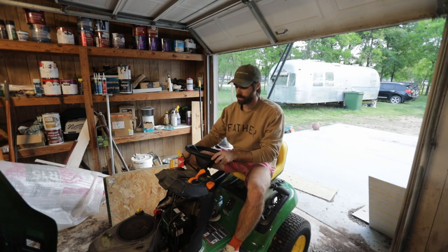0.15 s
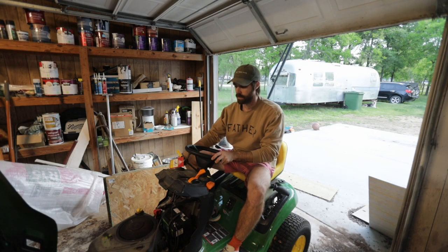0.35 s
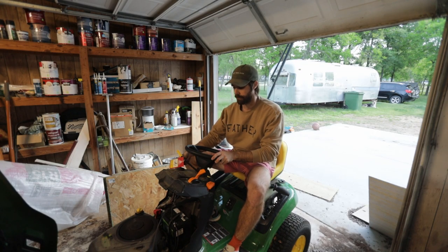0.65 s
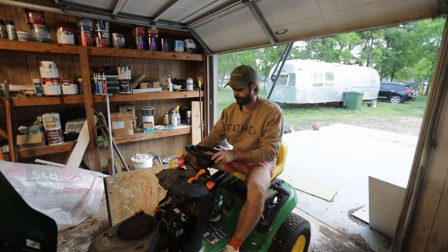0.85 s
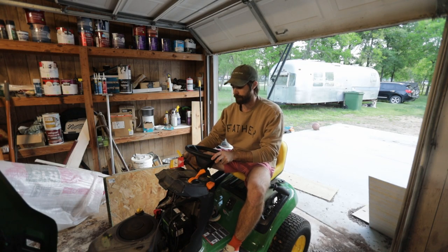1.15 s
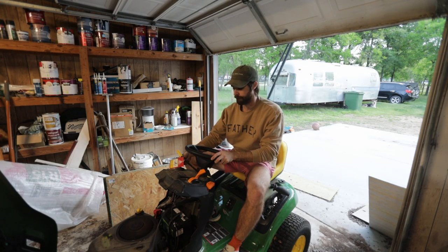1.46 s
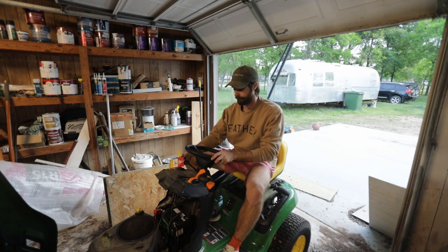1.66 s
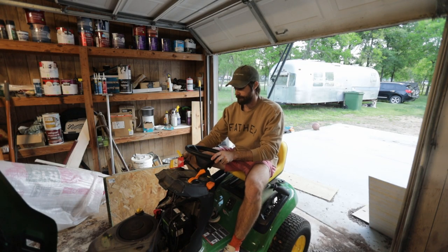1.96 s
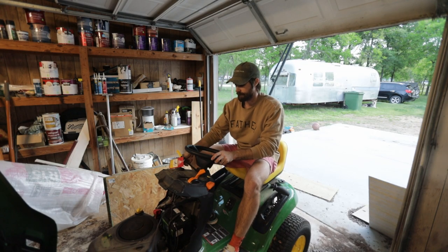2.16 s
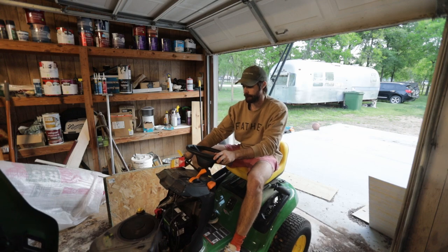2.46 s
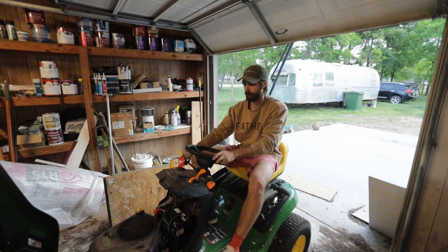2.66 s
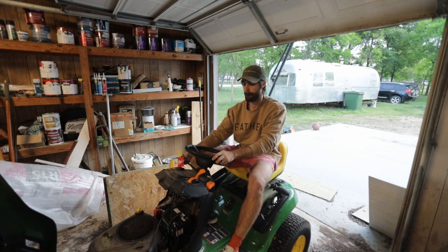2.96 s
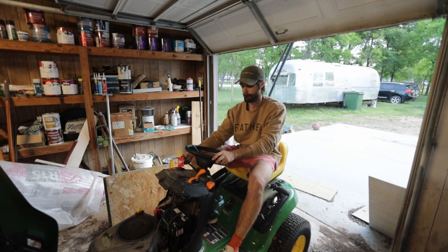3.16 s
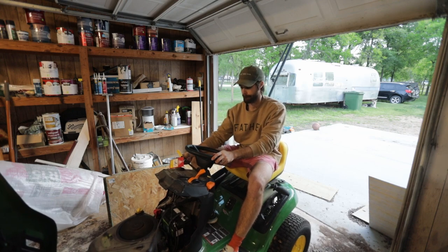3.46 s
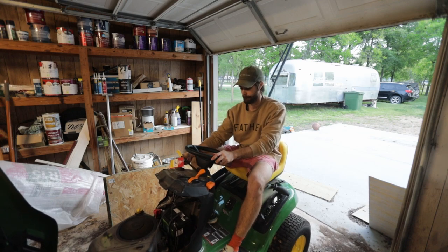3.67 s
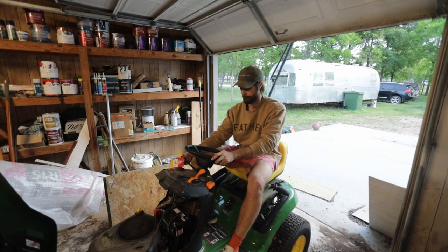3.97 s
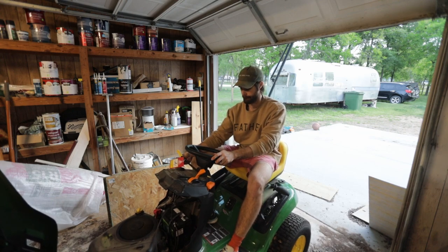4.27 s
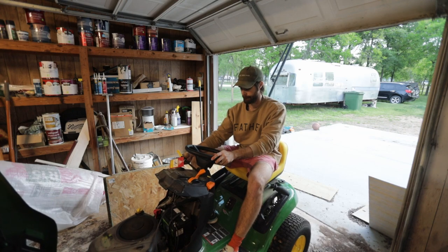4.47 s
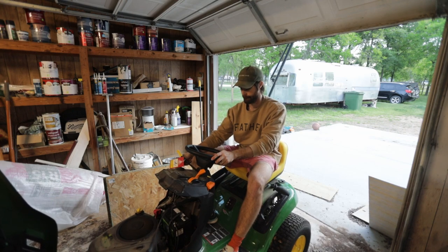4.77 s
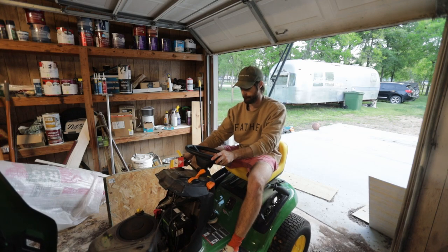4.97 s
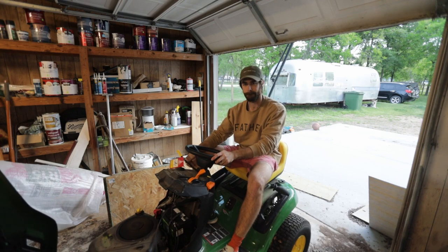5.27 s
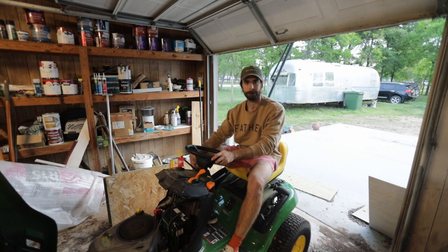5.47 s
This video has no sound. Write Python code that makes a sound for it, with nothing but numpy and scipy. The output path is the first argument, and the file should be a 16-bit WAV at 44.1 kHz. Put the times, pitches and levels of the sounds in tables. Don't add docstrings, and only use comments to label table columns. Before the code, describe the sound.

Close and loud, slightly distorted: a small petrol engine winds down with faint knocks, then the starter slams in and grinds for about a second and a half, chugging about six times a second. It stops, coasts and clunks. Another slam, more grinding and chugging, then the engine catches with a clatter and booms quickly to the end, with short garage reverberation.

```python
import sys
import numpy as np
from scipy import signal
from scipy.fft import rfft, irfft, next_fast_len
from scipy.io import wavfile

SR = 44100
rng = np.random.default_rng(int(sys.argv[2]) if len(sys.argv) > 2 else 0)


def log_audio(samples):
    frames = np.atleast_2d(samples).T
    limited = np.clip(frames, -1, 1)
    pcm = np.round(limited * 32767).astype(np.int16)
    wavfile.write(sys.argv[1], SR, pcm)


def decibels_to_gain(level_db):
    exponent = np.asarray(level_db, float) / 20
    return 10 ** exponent


N = 247742

# [frequency_hz, density_db_per_hz]
CRANK_COLOUR = [(24, -47), (40, -19), (64, -0.5), (166, -11.5), (280, -15.5), (418, -2), (688, -7.5),
                (1420, -5.5), (1870, -11.5), (3310, -4.5), (4360, -7), (5880, -15.5), (9210, -24),
                (10700, -27), (15600, -38.5)]
RUN_COLOUR = [(40, -15), (85, 13), (183, -2), (334, -23), (418, -19), (688, -21.5), (1000, -20.5),
              (1610, -22), (2170, -25), (3850, -26), (6000, -35), (9000, -43.5), (12000, -50),
              (15600, -48.5)]
# [frequency_hz, width_hz, level_over_colour_db]
CRANK_PEAKS = [(412, 150, 2.5), (765, 21, 3.5), (1000, 50, 1.5), (1331, 50, -0.5), (1429, 60, 2.5),
               (1751, 40, 3), (2128, 50, 3.5), (2386, 45, 4), (2675, 49, 0), (3175, 36, 0.5),
               (3794, 120, 2), (4390, 110, 2.5), (5070, 100, 2), (9500, 1300, 3.5)]
RUN_PEAKS = [(424, 70, 3.6), (872, 30, 10), (1000, 26, 4.9), (1600, 150, 1.4), (3760, 210, 2.8),
             (4520, 73, 2)]
# [frequency_hz, level_db, t60_s]
HOUSING = [(348, -5, .09), (385, -3, .1), (427.5, -3.5, 0.084), (500, -5, 0.029), (629, -7, 0.14),
           (727, -5, 0.017), (769, 4, 0.02), (1008, -5.5, 0.048), (1287, -2, .06), (1424, -10, 0.074),
           (1688, 0.5, 0.023), (2286, -2.5, 0.035), (2720, -22, .025)]
# [frequency_hz, t60_s, lag_ms]
SILENCER = [
    (71, .18, .2),
    (113, .07, 2.9),
    (188, .045, 3.4),
]
# [start_s, length_s, pitch_hz, level_db]
CHIRPS = [(.5, .04, 9080, -66), (0.557, 0.057, 3330, -53), (.568, 0.026, 9850, -57),
          (0.602, 0.037, 9740, -60), (.615, .05, 5600, -66), (0.353, .3, 231, -53), (0.437, 0.15, 415, -49),
          (0.495, 0.084, 1707, -57), (1.135, 0.041, 1417, -20), (2.62, 0.42, 543, -55),
          (0.716, 0.037, 362, -5), (.48, 0.17, 7400, -74), (3.19, 0.05, 1420, -19), (3.28, .04, 1450, -21),
          (4.647, 0.013, 1420, -17.5), (4.679, 0.025, 1468, -6.5), (4.847, 0.47, 1000, -23.5),
          (4.92, 0.47, 872, -28), (.79, .14, 1435, -22.5), (.93, .06, 1830, -25), (3.24, .1, 1850, -25),
          (.85, .13, 4900, -31), (3.31, .11, 4600, -28), (2.338, .03, 1030, -33)]
# [time_s, motion_below_cranking_db]
COASTS = [
    [(0.0, -11), (0.088, -16), (0.19, -17), (0.284, -23), (0.38, -29), (0.452, -27), (0.518, -32),
     (0.687, -39.5)],
    [(2.26, -12), (2.36, -15), (2.42, -18), (2.55, -22), (2.67, -34), (2.78, -42), (3.027, -43.5)],
]
# [solenoid_s, drive_stops_s, pinion_slam_db, slam_brightness_db, slam_knock_hz]
STARTS = [
    (0.69, 2.19, -1, 7, 1426),
    (3.029, 4.7, -4, -0.5, 743),
]
# [cranking_db, fall_near_rest_db, bend_of_fall, labouring_db, racing_db, step_at_firing_db]
GRIND = [
    (-33, -23.5, .8, -17, -5, 6),
    (-19.5, -35, 1.4, -2.5, -2.5, 2.5),
    (-21.5, -40.5, 1.02, -4, 1.5, -0.8),
    (-31, -47, .95, -8, 1.5, -1.5),
]
# [intake_opens_s, pop_db, first_turn_squeak_db, second_turn_squeak_db]
CYCLES = [
    [(0.784, -12, -18.5, -12), (1.022, -7.5, -40, -16), (1.201, -4.5, -21, -20.5), (1.373, -4, -17, -20.5),
     (1.539, -4.5, -20, -14), (1.706, -5, -27.5, -16), (1.87, -4.5, -11.5, -18.5), (2.033, -5, -40, -40),
     (2.207, -4.5, -40, -40)],
    [(3.03, -40, -40, -19), (3.261, -4.5, -17, -17.5), (3.454, -3.5, -10.5, -15), (3.623, -6, -24, -12.5),
     (3.791, -5.5, -16, -18), (3.952, -5, -40, -18), (4.119, -4, -18, -9), (4.283, -5, -29, -17.5),
     (4.445, -4.5, -15.5, -14), (4.608, -4.5, -15, -40), (4.734, -6, -40, -40)],
]
# [start_s, pop_db, valve_shuts_after_ms]
SLOW_INTAKE = [
    (.167, -18.5, 41.5),
    (2.459, -12.5, 30),
]
# [start_s, peak_db, brightness_db,
# knock_hz]
KNOCKS = [(.015, -28.5, -29, 1114), (.054, -22, -19.5, 1405), (0.115, -30.5, -19.5, 2600),
          (0.171, -23, -32, 1095), (0.21, -34, 7, 2420), (0.297, -30, -16, 1600), (0.393, -21, -26, 1160),
          (2.341, -27, -8.5, 1050), (2.37, -27, -3, 2000), (2.458, -19.5, -12, 2500),
          (2.482, -23, -2, 1540), (2.53, -26, -12.5, 3740)]
# [start_s, peak_db, brightness_db, knock_hz]
KICKS = [(4.646, -10, 1.5, 1470), (4.674, -10, -1, 4350), (4.685, -4.5, 9.5, 1460),
         (4.745, -11.5, 2.5, 4020), (5.105, -22, 4.5, 4080), (5.175, -22, 0.5, 910), (5.262, -21, 5, 3430)]
# [peak_db, brightness_db, housing_ring_db, rattle_s, knock_hz]
SOLENOID = (-9, -2, -4, .0077, 500)
FIRING_S = [4.664, 4.7754, 4.859, 4.9354, 5.0081, 5.0813, 5.1573, 5.2358, 5.3179, 5.4057, 5.4991, 5.589]
# [boom_db, crack_db, valve_tick_db]
FIRINGS = [(-10.5, -13.5, -13.5), (-10, -15, -11), (-15.5, -5.5, -13), (-6.5, -7, -22),
           (-11.5, -8.5, -17.5), (-8.5, -8, -22), (-9.5, -18, -26), (-11, -8, -16), (-8, -11, -20),
           (-12, -12.5, -24), (-10, -10.5, -15.5), (-11.5, -9.5, -15.5)]
CATCH_S = 4.72


def in_time(rows):
    s, *columns = np.transpose(rows)
    return [np.interp(np.arange(N) / SR, s, c) for c in columns]


def rms_one(x):
    return x / np.sqrt(np.mean(x ** 2) + 1e-20)


def clicks(times, db):
    out = np.full(N, 1e-18)
    at = np.clip(np.round(np.asarray(times) * SR).astype(int), 0, N - 1)
    np.add.at(out, at, decibels_to_gain(np.asarray(db)))
    return out


def ring(x, hz, t60):
    r, w = decibels_to_gain(-60 / (t60 * SR)), 2 * np.pi * hz / SR
    return signal.lfilter([0, np.sin(w)], [1, -2 * r * np.cos(w), r * r], x)


def soften(x, seconds):
    r = np.exp(-1 / (seconds * SR))
    return signal.lfilter([(1 - r) ** 2], [1, -2 * r, r * r], x)


def fade(x, seconds):
    return signal.lfilter([1], [1, -np.exp(-1 / (seconds * SR))], x)


def band(x, low_hz, high_hz):
    return signal.sosfilt(signal.butter(3, [low_hz, high_hz], "band", fs=SR, output="sos"), x)


def drift(rate_hz):
    return rms_one(soften(rng.standard_normal(N + SR), 1 / (2 * np.pi * rate_hz))[SR:])


def coloured(x, spectrum, peaks):
    hz = np.fft.rfftfreq(N, 1 / SR) + 1
    table_hz, table_db = np.transpose(spectrum)
    gain = decibels_to_gain(np.interp(np.log(hz), np.log(table_hz), table_db))
    humps = 1 + sum((decibels_to_gain(db) - 1) / (1 + (2 * (hz - at) / width) ** 2) for at, width, db in peaks)
    return irfft(rfft(x) * gain * humps, N)


def still_air():
    hiss = decibels_to_gain(-75.0) * band(rng.standard_normal(N), 9000, 15800)
    hush = decibels_to_gain(-64.5) * band(rng.standard_normal(N), 150, 1500)
    return hiss + hush + decibels_to_gain(-53.5) * band(rng.standard_normal(N), 130, 300)


def garage(x):
    t60_s, wall_cut_hz = .4, 1700
    size = next_fast_len(N + SR)
    w = 2 * np.pi * np.fft.rfftfreq(size, 1 / SR)
    t60 = t60_s / (1 + (w / (2 * np.pi * wall_cut_hz)) ** 2) ** 0.54
    tail = 0
    for k, lag in enumerate(np.geomspace(.013, .047, 10) * rng.uniform(0.9, 1.05, 10)):
        loop = 10 ** (-3 * lag / t60) * np.exp(-1j * w * lag)
        tail = tail + (-1) ** k * loop / (1 - loop)
    for lag in (.0013, .0031, .0047):
        delay = np.exp(-1j * w * lag)
        tail = tail * (delay - .6) / (1 - 0.41 * delay)
    return irfft(rfft(x, size) * tail, size)[:N]


def chirps():
    wander_share, wander_top_hz = .013, 30
    out = np.zeros(N)
    for s, length, hz, db in CHIRPS:
        size = round(length * SR)
        pitch = hz + min(wander_share * hz, wander_top_hz) * drift(23.5)[:size]
        swell = np.hanning(size) ** .5 * decibels_to_gain(3.4 * np.clip(drift(22)[:size], -3, 1.5))
        out[round(s * SR):][:size] += decibels_to_gain(db) * swell * np.sin(2 * np.pi * np.cumsum(pitch) / SR)
    return out


def cycles():
    last_cycle_s = .21
    s, *levels = np.vstack(CYCLES).T
    length = np.concatenate([np.diff(np.array(c)[:, 0], append=c[-1][0] + last_cycle_s) for c in CYCLES])
    since = s - np.repeat([on for on, *_ in STARTS], [len(c) for c in CYCLES])
    return s, length, since, levels


def tight_spots():
    s, length, _, (_, first_db, second_db) = cycles()
    times = np.concatenate([s + share * length for share in (.23, .725)])
    db = np.concatenate([first_db, second_db])
    heard = db > -35
    return times[heard], db[heard]


def squeaks():
    squeak_hz, spread_hz = 9150, 230
    out, t = np.zeros(N), np.arange(SR // 25) / SR
    for s, db in zip(*tight_spots()):
        hz = squeak_hz + spread_hz * rng.standard_normal()
        rub = rng.standard_normal(len(t)) * np.minimum(t / .004, 1) * np.exp(-t / .007)
        tone = ring(rub, hz, 0.015) + .6 * ring(rub, hz + 450, .008)
        out[round(s * SR):][:len(t)] += decibels_to_gain(db + 1.0) * tone / np.abs(tone).max()
    return out


def surge_db():
    tight = soften(fade(clicks(tight_spots()[0], 0), 0.015), .002)
    firing = np.array(FIRING_S)
    valve = np.cumsum(clicks(firing + 0.0033, 0) - clicks(firing + 0.044, 0))
    running = np.arange(N) / SR > CATCH_S
    return 3.7 * tight + 7.2 * (fade(valve, 0.0062) / (0.0073 * SR) - .5 * running)


def grind_db():
    mesh_s, labour_s, spin_up_s, race_s = .06, .13, .2, .16
    rest_db, run_eases_db = -40, -5
    driven = [(s, 0) for on, off, *_ in STARTS for s in (on + mesh_s, off)]
    motion_db, = in_time(sorted(driven + [tuple(row) for coast in COASTS for row in coast]))
    # [time_s, labouring share, racing share]
    stages = [(-.01, 0, 0), (0, 1, 0), (labour_s, 1, 0), (spin_up_s, 0, 1), (spin_up_s + race_s, 0, 0)]
    labour, race = in_time([(on + s, *shares) for on, *_ in STARTS for s, *shares in stages])
    fired, eased_db = in_time([(CATCH_S, 0, 0), (CATCH_S + .12, 1, 0), (N / SR, 1, run_eases_db)])
    slowed = np.maximum(motion_db / rest_db, 0)
    return [db + fall_db * slowed ** bend + labour_db * labour + race_db * race + step_db * fired + eased_db
            for db, fall_db, bend, labour_db, race_db, step_db in GRIND]


def turning_parts():
    heights = decibels_to_gain(2.3 * np.minimum(rng.exponential(1, N), 5.0))
    contacts = (rng.random(N) < 2500 / SR) * heights * rng.choice([-1, 1], N)
    drive = rng.standard_normal(N) + 0.65 * rms_one(contacts)
    fired = np.clip((np.arange(N) / SR - CATCH_S) / 0.05, 0, 1)
    streaks = 0
    for hz, width, db in CRANK_PEAKS:
        flare = decibels_to_gain(5 * np.clip(drift(16), -2, 1.7))
        streaks = streaks + rms_one(ring(drive * flare, hz, 3.0 / width)) * decibels_to_gain(db) * np.sqrt(width)
    crank = coloured(drive + decibels_to_gain(-45.0) * streaks, CRANK_COLOUR, CRANK_PEAKS)
    run = coloured(drive, RUN_COLOUR, RUN_PEAKS)
    shared, surge, out = drift(17), surge_db(), 0
    ranges_hz = [(40, 280), (280, 2000), (2000, 6500), (6500, 15800)]
    flickers_db = [1.2, .6, .7, .9]
    for (low, high), level_db, flicker_db in zip(ranges_hz, grind_db(), flickers_db):
        part = (1 - fired) * rms_one(band(crank, low, high)) + fired * rms_one(band(run, low, high))
        flicker = flicker_db * (shared + 1.6 * drift(25))
        out = out + part * decibels_to_gain(level_db + surge * (high / 15800) ** 0.42 + flicker)
    return out


def blow_list():
    rows = [(s, db, bright_db, -3, .016, hz) for s, db, bright_db, hz in KNOCKS]
    rows += [(s, db, bright_db, -1.5, .0095, hz) for s, db, bright_db, hz in KICKS]
    for on, _, db, bright_db, hz in STARTS:
        rows.append((on, *SOLENOID))
        rows.append((on + .017, db, bright_db, 3, .013, hz))
        rows.append((on + .084, -20, -10, 1.5, .011, 700))
    return rows


def blows():
    t, noise = np.arange(SR // 4) / SR, rng.standard_normal((3, N))
    crash, edge, knock, body = np.full((4, N), 1e-18)
    for s, db, bright_db, ring_db, length, hz in blow_list():
        at = slice(round(s * SR), min(round(s * SR) + len(t), N))
        shape = decibels_to_gain(db) * np.minimum(t / (.15 * length), 1) * np.exp(-(t / length) ** 0.86)
        shape = shape[:at.stop - at.start]
        struck = ring(shape * noise[0, at], hz, 25.0 / hz)
        knock[at] += decibels_to_gain(db) * struck / np.abs(struck).max()
        crash[at] += shape
        edge[at] += shape * decibels_to_gain(bright_db)
        body[at] += shape * decibels_to_gain(ring_db)
    rung = sum(decibels_to_gain(db - 26.5) * ring(soften(body, 2.7 / hz) * noise[2], hz, t60)
               for hz, db, t60 in HOUSING)
    low = band(rung + knock, 276, 12000)
    crash = band(crash * noise[0], 490, 4300) * decibels_to_gain(4.6)
    return low + crash + band(edge * noise[1], 2500, 12500) * decibels_to_gain(-7.0)


def intake():
    s, _, _, (db, *_) = cycles()
    slow_s, slow_db, slow_ms = np.transpose(SLOW_INTAKE)
    thud_db = np.r_[db - 4.5, slow_db - 4]
    hiss_db = np.r_[db - 10.5, slow_db - 18.5]
    shut_ms = np.r_[np.full(len(s), 16), slow_ms]
    s, db = np.r_[s, slow_s], np.r_[db, slow_db]
    shut = s + shut_ms / 1000
    pop = soften(clicks(s - .0005, db + 4.5), 0.00025)
    pop = ring(pop, 457, 0.014) / 60
    out = ring(pop, 415, 0.085) + decibels_to_gain(-8.0) * ring(pop, 490, 0.034) + decibels_to_gain(-9.0) * ring(pop, 340, 0.04)
    rush = fade(clicks(s, db), .05) * rng.standard_normal(N)
    out += decibels_to_gain(7.0) * band(rush, 300, 620)
    open_valve = soften(np.cumsum(clicks(s - .003, 0) - clicks(shut + .012, 0)), .0015)
    out = out * (.12 + .88 * open_valve)
    thud = soften(clicks(shut, thud_db) + clicks(shut + 0.012, thud_db - 17.0), 0.00019)
    thud_modes = [(178, 0, .084), (428, -4, .045), (243, -5, .098), (590, -.5, .07),
                  (55, -17, .2), (1300, -17, .065)]
    out += sum(decibels_to_gain(mode_db) * ring(thud, hz, t60) for hz, mode_db, t60 in thud_modes)
    spit = fade(soften(clicks(shut - .008, hiss_db - 2.5), 0.0022), 0.015) * rng.standard_normal(N)
    return out + band(spit, 980, 5060) * decibels_to_gain(11.0) + band(spit, 6800, 21000) * decibels_to_gain(-6.0)


def unfired_puffs():
    s, length, since, _ = cycles()
    delay = .39 * length
    at = s + delay
    db = -19 - 25 * np.exp(-(since + delay) / .25)
    unfired, k = at < FIRING_S[0] - .03, np.arange(3)
    return np.r_[at[unfired], .003 + .066 * k], np.r_[db[unfired], -28 - 6 * k]


def exhaust():
    door_echo_s, door_echo_db, overtone_db = .0193, -1, -8.5
    opening_s = .0006
    puff_s, puff_db = unfired_puffs()
    s, (boom_db, crack_db, tick_db) = np.array(FIRING_S), np.transpose(FIRINGS)
    (boom_hz, boom_t60, boom_ms), (over_hz, over_t60, over_ms), (pipe_hz, pipe_t60, pipe_ms) = SILENCER
    puffs = clicks(puff_s + .004, puff_db + 0.5) + clicks(puff_s + .047, puff_db - 6.0)
    boom = soften(clicks(s + boom_ms / 1000, boom_db), opening_s)
    out = ring(soften(puffs, 0.00097) + boom, boom_hz, boom_t60)
    overtone = clicks(s + over_ms / 1000, boom_db + overtone_db)
    out += ring(soften(overtone, opening_s), over_hz, over_t60)
    crack_s = s + pipe_ms / 1000
    echo = clicks(crack_s + door_echo_s, crack_db + 3.5 + door_echo_db)
    crack = clicks(crack_s, crack_db + 5.0) - echo
    out += ring(soften(crack, opening_s), pipe_hz, pipe_t60)
    tick = fade(clicks(s + .004, tick_db + 10.0), 0.008) * rng.standard_normal(N)
    bright_tick = band(band(tick, 4250, 5400), 3840, 5130) + decibels_to_gain(-10.0) * band(tick, 6400, 8900)
    return bright_tick - out


def scene():
    sharp, squeal = intake() + blows(), squeaks()
    tail = garage(sharp + decibels_to_gain(-2.5) * squeal)
    mix = sharp + squeal + decibels_to_gain(-18.5) * tail + exhaust() + turning_parts() + chirps() + still_air()
    return mix[None]


def low_pass(x):
    return signal.sosfilt(signal.butter(12, 15710, fs=SR, output="sos"), x)


def record(dry):
    cut = signal.sosfilt(signal.butter(5, 41, "high", fs=SR, output="sos"), dry)
    top = 1.02
    mix = cut / (1 + np.abs(cut / top) ** 12) ** (1 / 12)
    return low_pass(mix)


dry = scene()
out = record(dry)
log_audio(out)
```